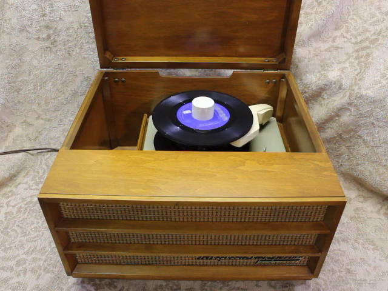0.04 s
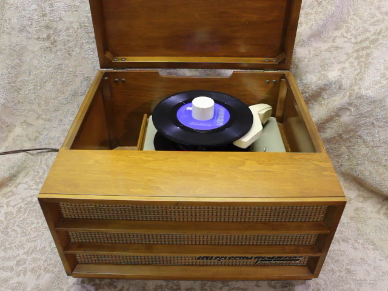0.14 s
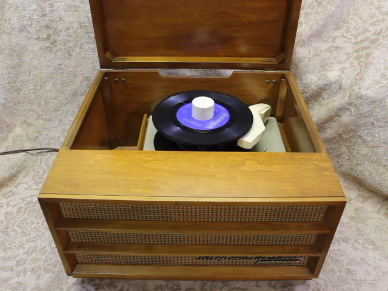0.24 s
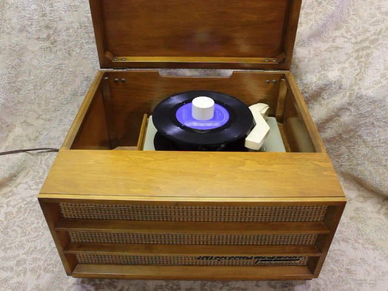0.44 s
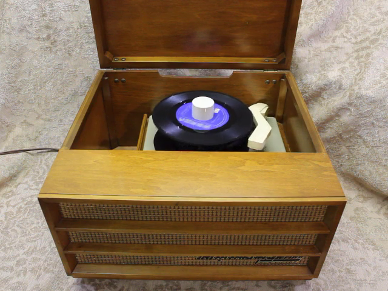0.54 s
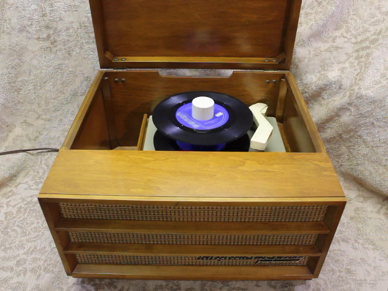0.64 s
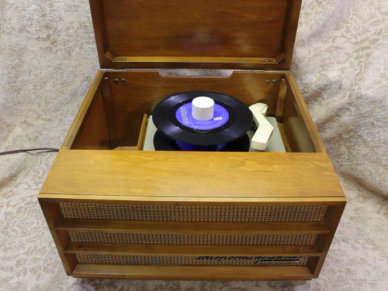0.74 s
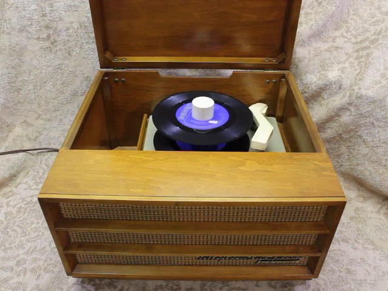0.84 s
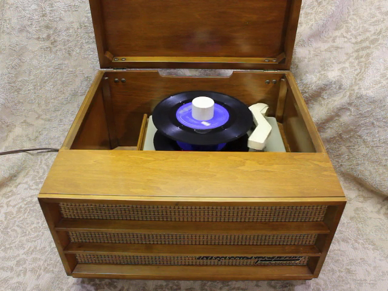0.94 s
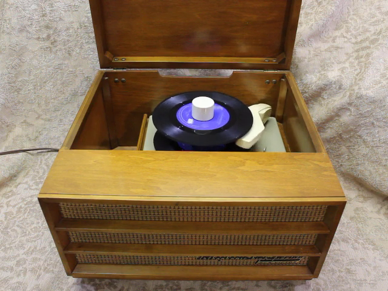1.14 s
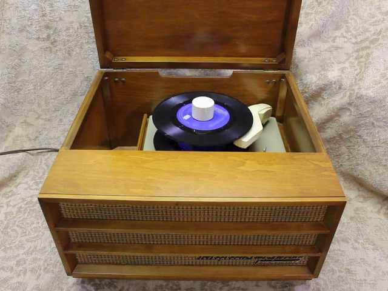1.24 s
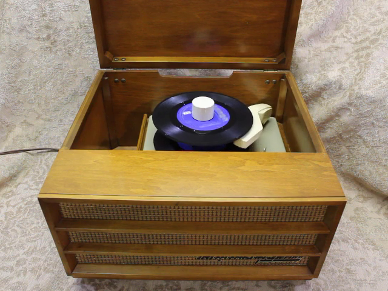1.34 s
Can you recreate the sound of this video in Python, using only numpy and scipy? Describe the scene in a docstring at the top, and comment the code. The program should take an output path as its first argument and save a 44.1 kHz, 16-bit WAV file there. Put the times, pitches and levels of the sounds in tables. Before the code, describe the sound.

An automatic record changer clicks, knocks, then gives a loud metal clank and a spring snap. More knocks and ticks follow as a record drops with a soft, dull thump. Its motor hums faintly in a small room.

```python
"""In a small furnished room, an automatic record changer works in an open wooden cabinet.
Its motor hums and rumbles, and a turning cam rubs. Small steel catches tick, a lever knocks
three times, the arm linkage clanks and a spring snaps home. Then a record drops with a dull thump.
Each blow is a short burst of noise, and the main ones also set a part ringing with its own tones."""
import sys
import numpy as np
from scipy import signal
from scipy.fft import irfft, next_fast_len
from scipy.io import wavfile

SR = 44100
rng = np.random.default_rng(int(sys.argv[2]) if len(sys.argv) > 2 else 0)


def file_out(sig):
    """Save sig as 16-bit WAV at sys.argv[1]."""
    # one column per channel
    cols = np.atleast_2d(sig).T
    # limit, then scale
    lim = np.clip(cols, -1, 1)
    pcm = np.round(lim * 32767).astype(np.int16)
    wavfile.write(sys.argv[1], SR, pcm)


N = 61739
TIME = np.arange(N) / SR

# The motor's steady tones. Each row: pitch in Hz, level in dB.
MOTOR_TONES = [(61, -64.5), (119.5, -60), (241, -69), (297, -63.5), (2116, -66.5), (2579, -65.5)]

# How the background noises rise and fall. Each row: time in seconds, relative level in dB.
RUMBLE_LEVELS = [(0, -54), (.7, -52.5), (.87, -57.5), (1.0, -54), (1.39, -53)]
CAM_LEVELS = [(0, -11), (.22, -6.5), (.33, -2), (.39, -11), (.5, -17), (.58, 9.5), (.66, -3), (.91, -49),
              (.95, 5), (.985, 4.5), (1.01, -4), (1.2, -3.5), (1.39, -8)]

# When each part is struck.
# Each row: start in seconds, relative level in dB, added brightness in dB per octave.
PAWL_BLOWS = [(.2062, -14, 0.5)]  # the pawl is the latch that trips the cycle
CATCH_BLOWS = [(.398, -36.5, -6), (0.4017, -39.5, -5.5), (.419, -31.5, -3.5), (.565, -30, -2.5),
               (1.057, -38.5, -4.5), (1.068, -37.5, -6), (1.1032, -18, 3.4), (1.181, -45, -4),
               (1.22, -53, -9)]
LEVER_BLOWS = [(.4297, -16, -0.4), (.9175, -21.5, 1.5), (1.0765, -16, 0.4)]
LINKAGE_BLOWS = [(.593, -39.5, -9.5), (.6052, -13.5, 0.5), (.662, -47.5, -3)]
SPRING_BLOWS = [(.691, -10.5, 0.5), (.699, -29, -4), (.732, -37.5, -6), (.741, -40, 2)]  # one snap, then its rebounds
RECORD_BLOWS = [(1.028, -37, -0.5), (1.086, -30, 0.5), (1.135, -37.5, 0), (1.205, -49, -3.5),
                (1.2495, -34, 3)]  # the record slips, lands and settles

# The tones a struck part rings with. A fade time is how long a sound takes to drop by 60 dB.
# Each row: pitch in Hz, relative level in dB, fade time in seconds.
PAWL_TONES = [(270, -20.5, 0.13), (584.4, -15.5, 0.09), (1041, -21, 0.11), (1383, -28, 0.15),
              (1800, -15, 0.066), (4134, -5, 0.045), (5320, -6, 0.039), (6020, -7, 0.059),
              (11030, -5, 0.051), (11240, -20.5, .16)]  # the pawl and its fine spring
LEVER_TONES = [(664.5, -15.5, 0.2), (811, -14.5, 0.19), (1188, -18, 0.21), (1330, -16.5, 0.2),
               (1859, 0.5, 0.04), (1962, 4, 0.057), (2260, -20.5, 0.069), (2736, -5.5, 0.062),
               (2835, -0.5, 0.053), (3760, -11.5, 0.057), (4228, -0.5, 0.052), (5275, -13, .065),
               (5910, -15.5, 0.038)]
LINKAGE_TONES = [(697, -10.5, 0.22), (947, -6.5, 0.082), (1075, -0.5, 0.096), (1423, -12.5, 0.16),
                 (1986, 6, 0.12), (2052, 0, 0.14), (1960, 5.5, 0.11), (2184, 10, 0.081), (2260, 4, 0.081),
                 (3228, -9, 0.082), (4100, -13, .09), (4170, 5, 0.062), (5550, -8, .06), (6900, -7, 0.023),
                 (6600, -10.5, .09), (9540, -21, 0.069)]
SPRING_TONES = [(279.5, -21, 0.16), (566.7, -12, 0.11), (1085, -16.5, 0.12), (1162, -15, .2),
                (1898, -3.5, 0.04), (2670, -8, 0.11), (2830, -14.5, 0.15), (3020, -19, 0.15),
                (3350, 2.5, 0.039), (3884, -17, .14), (4250, -10.5, 0.1), (4747, -16, 0.11)]
RECORD_TONES = [(251, -13, 0.36), (286.3, -6, 0.26), (578, -0.5, 0.096), (624, -5, 0.17), (1836, -10, 0.12),
                (1990, -10, .1)]  # the record and the platter it lands on

# The colour of each noise. For a struck part, noise stands for tones too crowded to tell apart.
# Each row: frequency in Hz, relative level in dB.
RUMBLE_NOISE = [(25, -16), (60, -7), (85, -18.5), (135, 1.5), (190, -8.5), (290, -13), (450, -10),
                (650, -10), (1000, -11.5), (1600, -18), (2200, -15.5), (4000, -19), (8000, -26),
                (12000, -34), (15500, -47)]
CAM_NOISE = [(60, -35.5), (280, -1), (450, 1.5), (650, 3.5), (1000, -8.5), (1550, -11), (2000, -9.5),
             (3000, -15.5), (4500, -15.5), (8000, -21), (15000, -45)]
CATCH_NOISE = [(40, -21), (130, -13), (350, -22.5), (600, -7), (1300, -15), (2000, -5.5), (2800, -7.5),
               (4300, 1), (6200, -0.5), (9000, 0.5), (11000, -4.5), (12500, -7.5), (15500, -34)]
LEVER_NOISE = [(40, -35), (140, -16.5), (400, -9.5), (800, 1.5), (1100, -5), (1550, -16.5), (1900, 1),
               (2800, -6.5), (3300, -7), (5500, -13), (6500, -11.5), (9000, -14), (11000, -29),
               (15500, -47)]
LINKAGE_NOISE = [(25, -26), (60, -26), (130, -27), (250, -20.5), (600, -19), (1100, -4), (1550, -10.5),
                 (2100, 11), (2800, -12), (4200, 0.5), (5500, -14), (6500, -1.5), (7800, -16), (9400, -9),
                 (11500, -32.5), (15500, -34)]
SPRING_NOISE = [(40, -22), (140, -27.5), (550, -9.5), (850, -10.5), (1150, -6), (1550, -9.5), (2000, -10),
                (3300, 1), (4500, -4), (6000, -6), (8000, -11), (10000, -15), (12000, -26.5), (15500, -42)]
RECORD_NOISE = [(30, -13), (140, -21), (200, -6.5), (280, -4), (420, -3.5), (600, -9.5), (900, -7.5),
                (1500, -12), (2000, -6.5), (2800, -19), (4200, -20.5), (9000, -25), (15000, -69)]

# A low boom from the changer's frame.
# One row: start in seconds, pitch in Hz, level in dB, fade time in seconds.
FRAME_BOOM = (0.7, 63, -38, 0.2)

BAND_EDGES = np.geomspace(25, 17000, 36)  # in Hz, about a quarter of an octave apart
BAND_HZ = np.sqrt(BAND_EDGES[1:] * BAND_EDGES[:-1])
RING_SAMPLES = SR // 2
BASS_FLOOR_HZ = 470  # below this pitch, a burst's brightness tilt and fade time stop changing
ROOM_FADE_S, ROOM_RISE_S, ROOM_CUT_HZ = 0.3, 0.007, 5300
TREBLE_STOP_HZ = 16300


def from_db(db):
    """Turns decibels into a number to multiply a sound by."""
    return 10 ** (np.asarray(db) / 20)


def fading(t, fade_s):
    """A level that starts at one and drops by 60 dB every fade_s seconds."""
    return np.exp(-np.log(1000) * t / fade_s)


def rising(t, rise_s):
    """A level that climbs smoothly from zero to one."""
    return np.sin(np.pi / 2 * np.clip(t / rise_s, 0, 1))


def noise_bands(colour):
    """Noise of the given colour, split into bands whose sum has an average (rms) level of one."""
    hz, db = np.transpose(colour)
    size = next_fast_len(N, True)
    freqs = np.fft.rfftfreq(size, 1 / SR)
    gains = from_db(np.interp(np.log(freqs + 1), np.log(hz), db))
    spectrum = gains * np.exp(2j * np.pi * rng.random(len(freqs)))  # random phases make it noise
    bands = np.array([irfft(spectrum * (freqs >= low) * (freqs < high), size)[:N]
                      for low, high in zip(BAND_EDGES, BAND_EDGES[1:])])
    return bands / bands.sum(0).std()


def bursts(blows, colour, level_db, rise_s, hold_s, crack_s, tail_db, tail_s, damping, absorb_hz=SR):
    """Each blow is a short crack and a weaker tail from the cabinet; both fade sooner in the treble."""
    bands, out = noise_bands(colour), np.zeros(N)
    centre_hz = np.exp(np.average(np.log(BAND_HZ), weights=bands.var(1)))
    t = TIME[:RING_SAMPLES]
    after_hold = np.maximum(t - hold_s, 0)
    for band, hz in zip(bands, BAND_HZ):
        floored_hz = max(hz, BASS_FLOOR_HZ)
        stretch = (floored_hz / 2000) ** -damping  # scales the fade times crack_s and tail_s
        crack = fading(after_hold, crack_s * stretch)
        tail = from_db(tail_db) * fading(after_hold, tail_s * stretch / np.hypot(1, hz / absorb_hz))
        shape = rising(t, rise_s + 2 / hz) * np.hypot(crack, tail)
        for start_s, db, brightness in blows:
            start = int(start_s * SR)
            noise = band[start:start + RING_SAMPLES]
            gain = from_db(db + level_db + brightness * np.log2(floored_hz / centre_hz))
            out[start:start + len(noise)] += gain * shape[:len(noise)] * noise
    return out


def ringing(blows, tones, rise_s):
    """Every blow sets the part's tones ringing, in a slightly different mix each time."""
    out, t = np.zeros(N + RING_SAMPLES), TIME[:RING_SAMPLES]
    hz, tone_db, fade_s = np.transpose(tones)
    rings = np.sin(2 * np.pi * hz[:, None] * t) * fading(t, fade_s[:, None]) * rising(t, rise_s)
    signs = (-1) ** np.arange(len(hz))  # every other tone starts by swinging the opposite way
    for start_s, db, brightness in blows:
        start = int(start_s * SR)
        tilt_db = brightness * np.log2(hz / np.median(hz))
        gains = from_db(db + tone_db + tilt_db + rng.normal(0, 0.37, len(hz)))
        out[start:start + RING_SAMPLES] += (signs * gains) @ rings
    return out[:N]


def in_room(sound, echo_db):
    """Adds the duller, blurred echoes from the lid and the room."""
    echo = (rng.standard_normal(N) * fading(TIME, ROOM_FADE_S) * rising(TIME, ROOM_RISE_S))[:RING_SAMPLES]
    dull_echo = signal.lfilter(*signal.butter(1, ROOM_CUT_HZ, fs=SR), echo / np.linalg.norm(echo))
    return sound + from_db(echo_db) * signal.fftconvolve(sound, dull_echo)[:N]


def motor():
    """The motor hums and faintly whines, the drive rumbles, and the cam (a shaped wheel) rubs."""
    hum = sum(from_db(db) * np.sqrt(2) * np.sin(2 * np.pi * (hz * TIME + rng.random()))
              for hz, db in MOTOR_TONES)
    rub_db = np.interp(TIME, *np.transpose(CAM_LEVELS)) - 49
    rub = from_db(rub_db) * noise_bands(CAM_NOISE).sum(0)
    rumble_db = np.interp(TIME, *np.transpose(RUMBLE_LEVELS))
    rumble = from_db(rumble_db) * noise_bands(RUMBLE_NOISE).sum(0)
    return hum + rub + rumble


def frame():
    """The frame gives a brief low boom at 0.7 s."""
    start_s, hz, db, fade_s = FRAME_BOOM
    t = np.maximum(TIME - start_s, 0)
    return from_db(db) * np.sin(2 * np.pi * hz * t) * fading(t, fade_s) * rising(t, rise_s=0.035)


def falling_record():
    """The record thumps dully onto the platter."""
    ring = in_room(ringing(RECORD_BLOWS, RECORD_TONES, rise_s=0.008), echo_db=-10)
    thumps = bursts(RECORD_BLOWS, RECORD_NOISE, level_db=-1.45, rise_s=0.00052, hold_s=0.0064,
                    crack_s=0.058, tail_db=-12, tail_s=0.3, damping=0.39)
    return ring + thumps


def catches():
    """Small steel parts make thin, bright ticks; the pawl also rings."""
    ring = in_room(ringing(PAWL_BLOWS, PAWL_TONES, rise_s=0.0011), echo_db=-10)
    pawl = bursts(PAWL_BLOWS, CATCH_NOISE, level_db=0.44, rise_s=0.0037, hold_s=0.0019,
                  crack_s=0.064, tail_db=-14, tail_s=0.3, damping=0.46)
    ticks = bursts(CATCH_BLOWS, CATCH_NOISE, level_db=-1.1, rise_s=0.0012, hold_s=0.003,
                   crack_s=0.058, tail_db=-13.5, tail_s=0.28, damping=0.33)
    return ring + pawl + ticks


def lever():
    """The cam's lever strikes three times, each a hollow knock."""
    ring = in_room(ringing(LEVER_BLOWS, LEVER_TONES, rise_s=0.0018), echo_db=-13)
    knocks = bursts(LEVER_BLOWS, LEVER_NOISE, level_db=-5, rise_s=0.00036, hold_s=0.0043,
                    crack_s=0.071, tail_db=-8, tail_s=0.23, damping=0.32)
    return ring + knocks


def spring():
    """The return spring snaps home and rings; its rebounds are only quiet bursts of noise."""
    ring = in_room(ringing(SPRING_BLOWS[:1], SPRING_TONES, rise_s=0.0024), echo_db=-15)
    snaps = bursts(SPRING_BLOWS, SPRING_NOISE, level_db=0.5, rise_s=0.0002, hold_s=0.0042,
                   crack_s=0.056, tail_db=-18.5, tail_s=0.32, damping=0.099, absorb_hz=8200)
    return ring + snaps


def linkage():
    """The links that move the arm clank loudly; tones close in pitch make the ring flutter."""
    ring = in_room(ringing(LINKAGE_BLOWS, LINKAGE_TONES, rise_s=0.0056), echo_db=-21)
    clank = bursts(LINKAGE_BLOWS, LINKAGE_NOISE, level_db=-0.5, rise_s=0.015, hold_s=0.011,
                   crack_s=0.068, tail_db=-14, tail_s=0.21, damping=0.33)
    return ring + clank


def scene():
    """Adds all the parts of the changer into one channel."""
    return (motor() + catches() + lever() + linkage() + spring() + frame() + falling_record())[None]


def record(dry):
    """Clips any peak above full level, then cuts the very highest treble."""
    treble_cut = signal.cheby2(14, 60, TREBLE_STOP_HZ, fs=SR, output="sos")
    return signal.sosfilt(treble_cut, np.clip(dry, -1, 1))


dry = scene()
out = record(dry)
file_out(out)
```